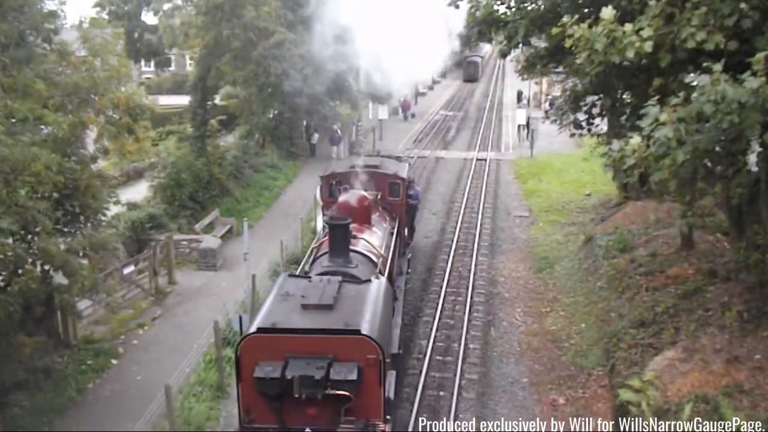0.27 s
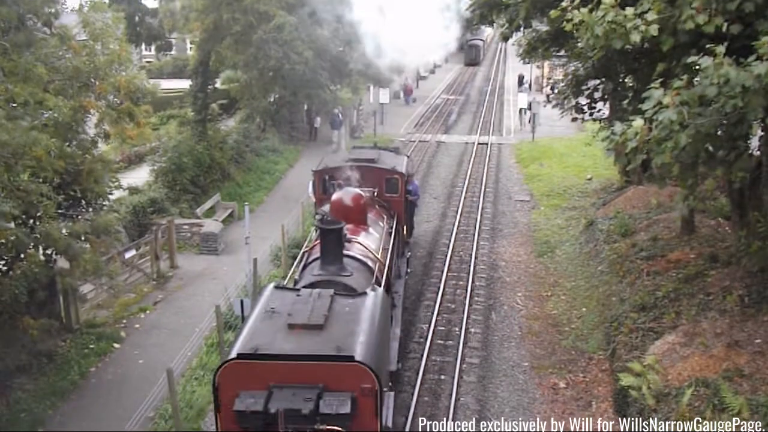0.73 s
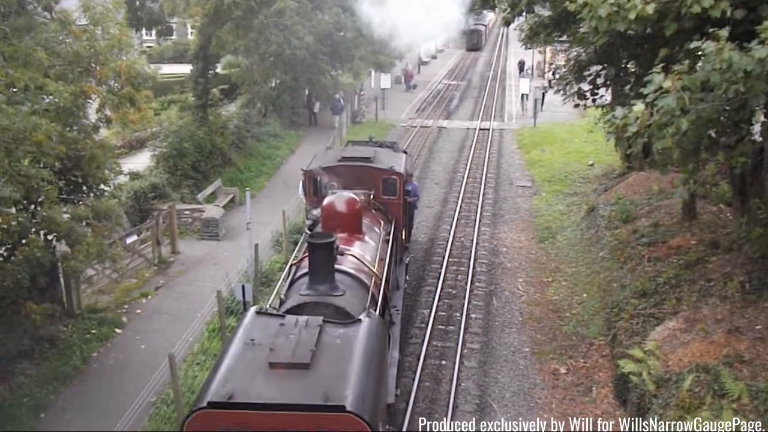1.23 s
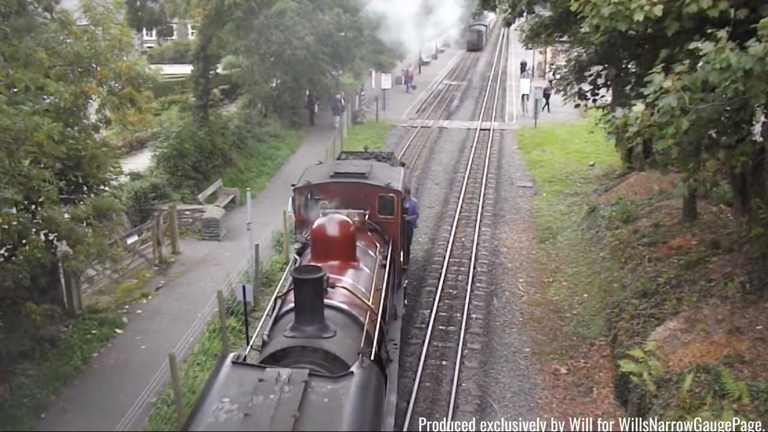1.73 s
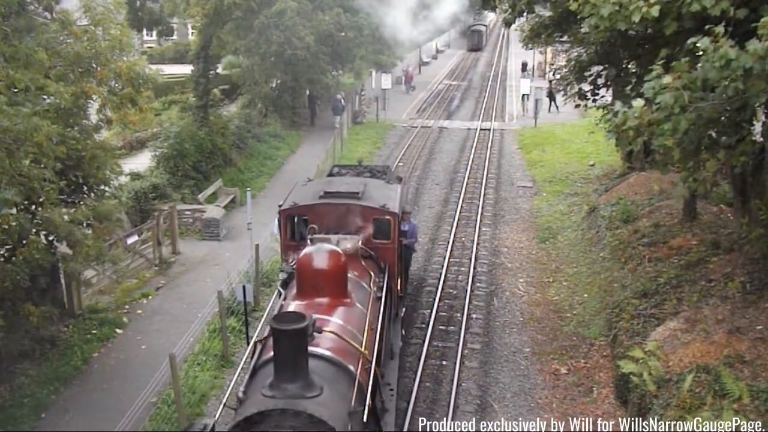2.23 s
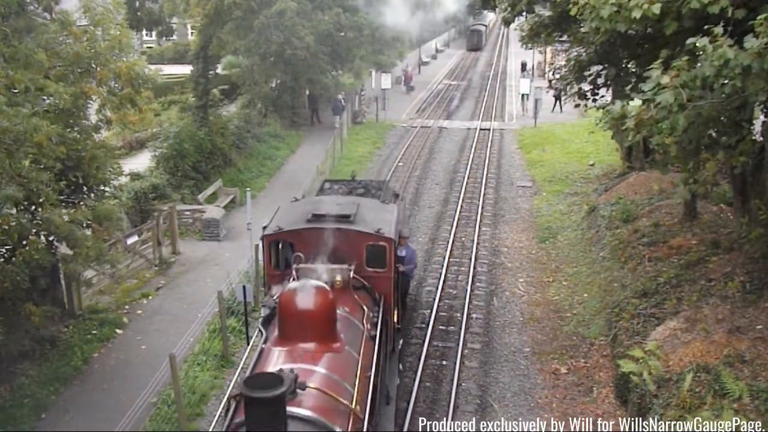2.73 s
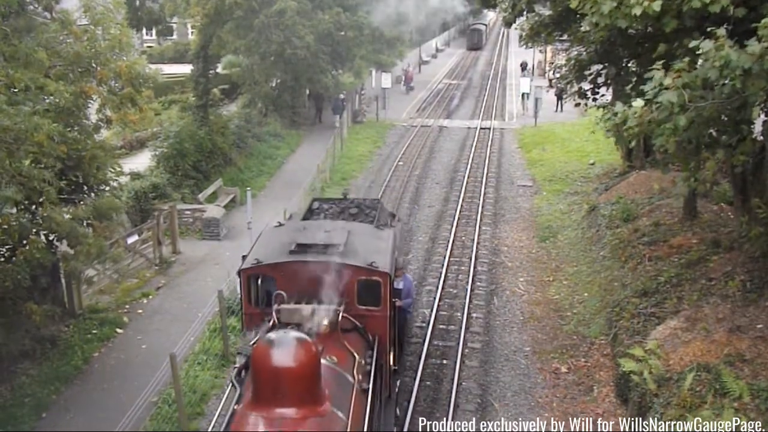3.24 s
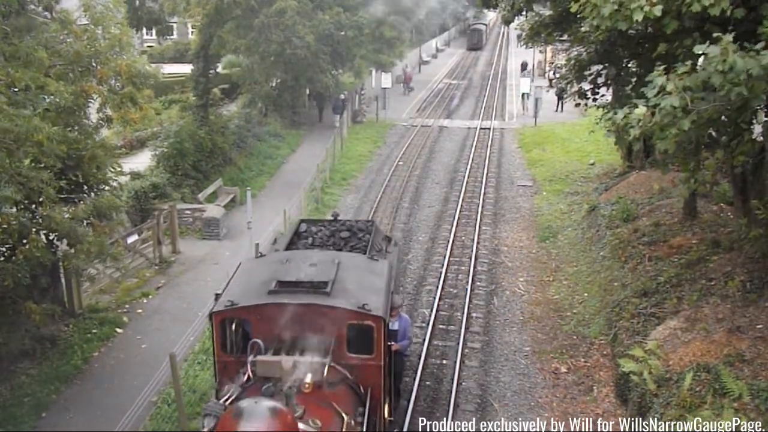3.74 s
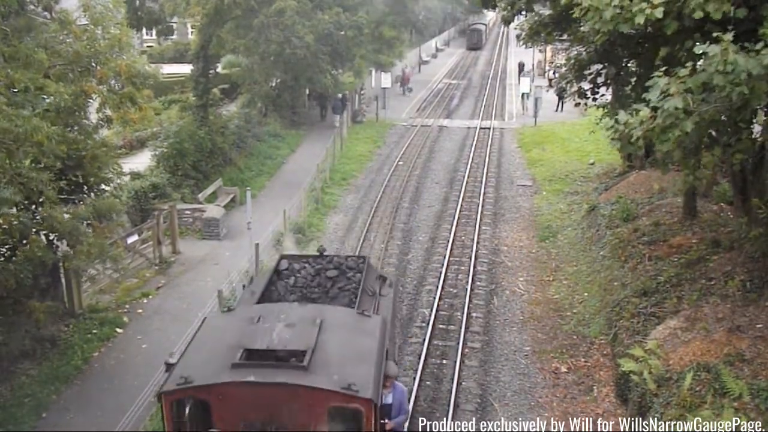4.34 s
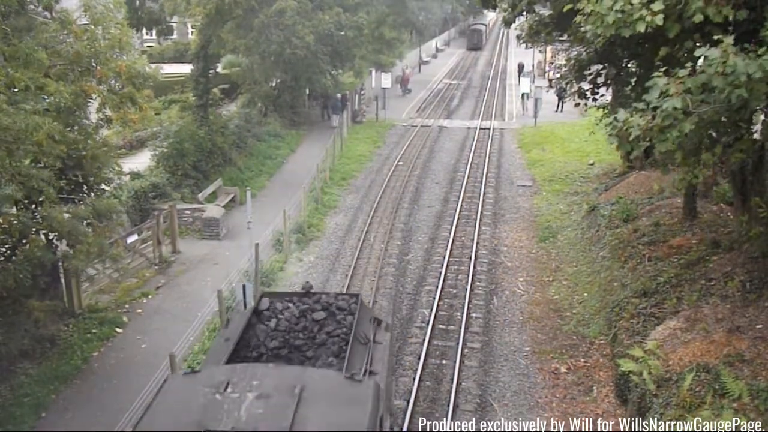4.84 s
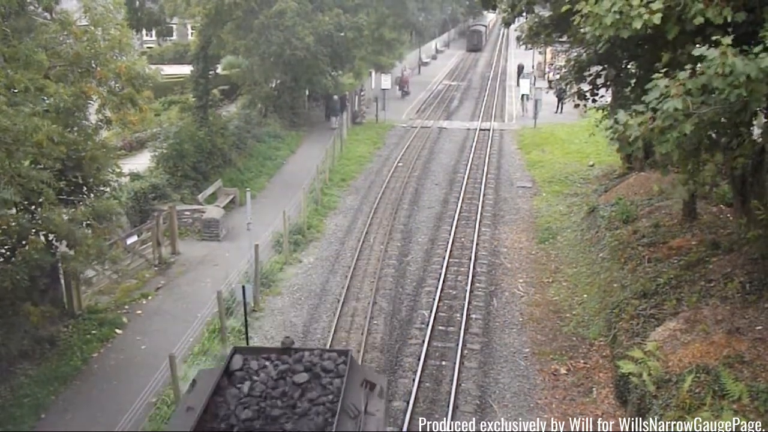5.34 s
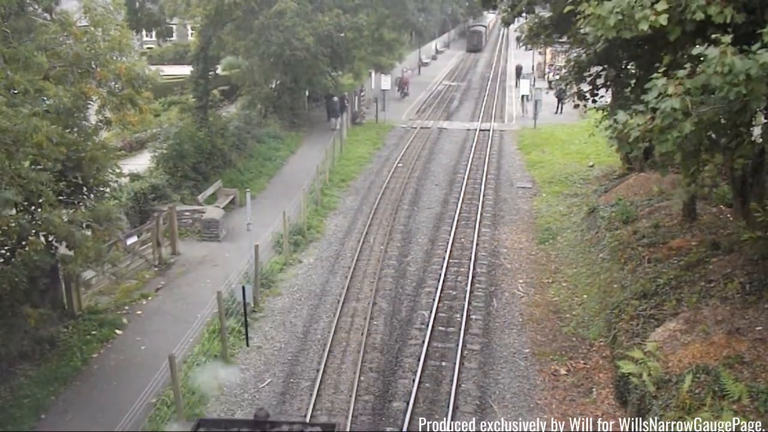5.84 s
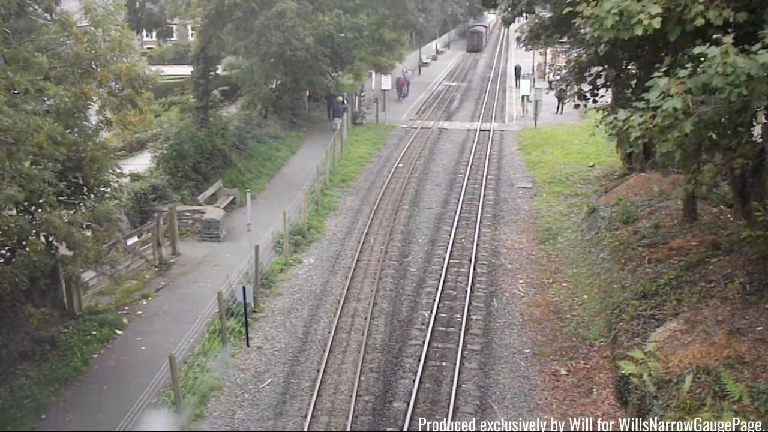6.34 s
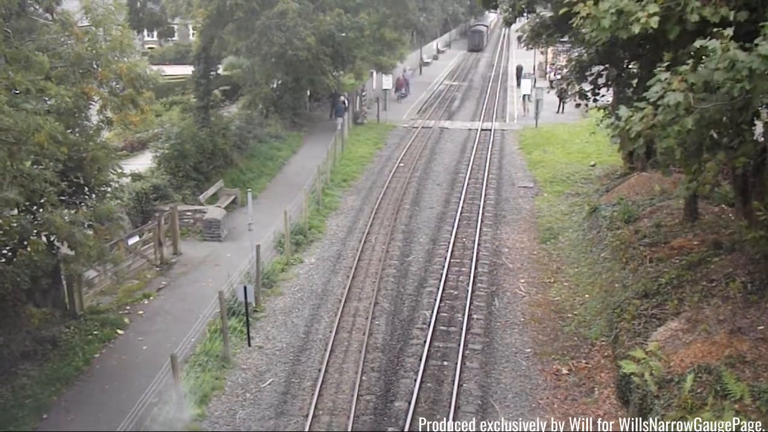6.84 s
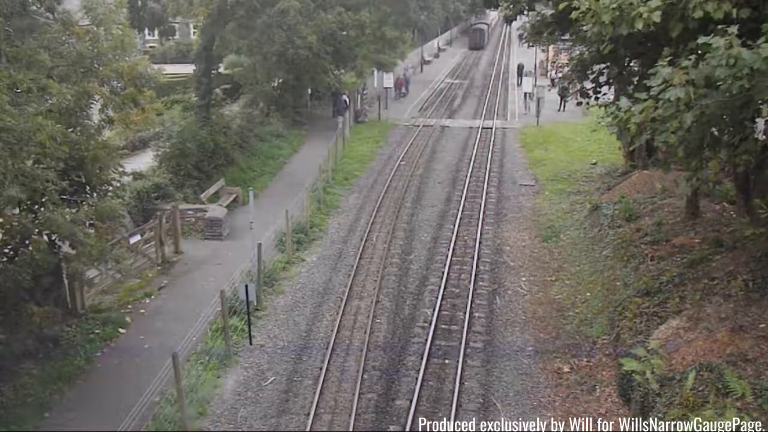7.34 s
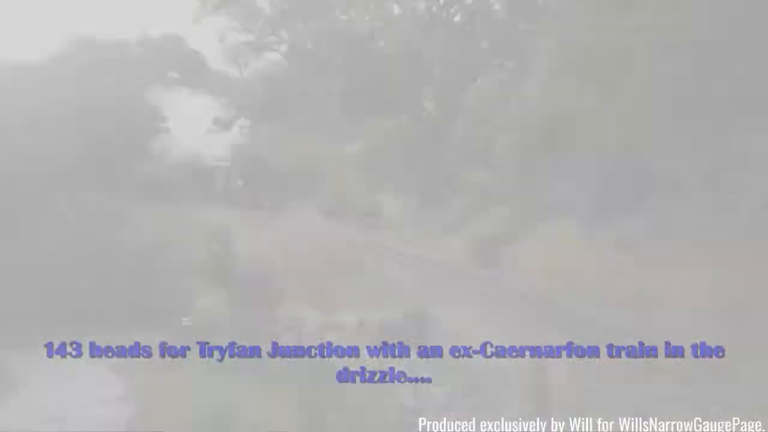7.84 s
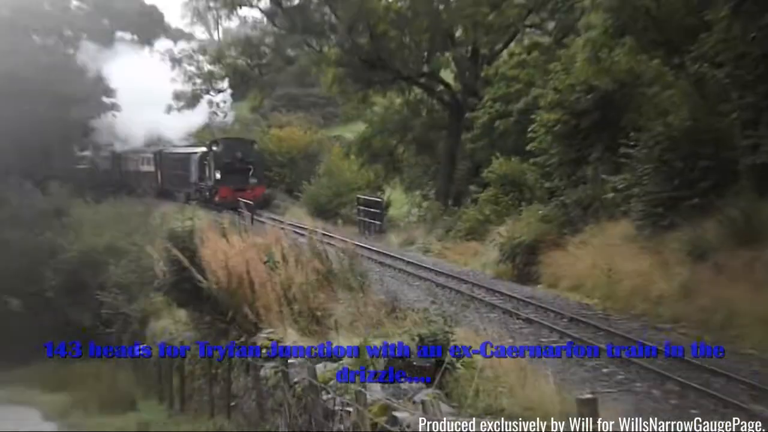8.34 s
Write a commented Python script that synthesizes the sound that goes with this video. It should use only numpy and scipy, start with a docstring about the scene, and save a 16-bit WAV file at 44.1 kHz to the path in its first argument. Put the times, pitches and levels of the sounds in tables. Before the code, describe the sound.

A small steam locomotive rolls close beneath, its safety valve hissing with a fluttering, ringing roar, then a smoother hiss fades into faint drizzle.

```python
"""A safety valve sputters and rings on a passing narrow-gauge steam locomotive until the cab hides it.
Its steam is noise through throat and casing resonances under a fluttering jet. A smoother leak, band-shaped
noise, swells and fades behind it, over rumbling wheels, narrow hums, and knocks and squeaks of the running gear.
The engine fades into a quiet lineside: a faint wash of drizzle, a small motor's whir, and a few near drops
that tick as short rings and splashes."""
import sys
import numpy as np
from scipy import signal
from scipy.fft import rfft, irfft, next_fast_len
from scipy.io import wavfile
from scipy.ndimage import uniform_filter1d, map_coordinates

SR = 44100
rng = np.random.default_rng(int(sys.argv[2]) if len(sys.argv) > 2 else 0)


def store_pcm(level_fs):
    """Save levels as 16-bit WAV."""
    pcm = np.round(np.clip(level_fs, -1, 1) * 32767).astype(np.int16)
    wavfile.write(sys.argv[1], SR, np.atleast_2d(pcm).T)


N = 378378

# Resonances of the valve's throat, of a shoulder that radiates upward, and of the casing:
# (centre [Hz], half-width [Hz], relative level [dB])
THROAT_MODES = [(3850, 230, -9), (4095, 130, -2), (4310, 93, -7.5)]
SHOULDER_MODES = [(3470, 140, -4.5), (3800, 280, -3.5), (4260, 170, -2)]
CASING_MODES = [(829, 18, -3.5), (968, 15, -4), (1168, 30, -5.5), (1360, 26, -5), (1480, 11, -1.5),
                (1706, 110, -6), (1802, 28, 2), (1943, 126, 0)]
# Spectra of the broad blow, the jet and the wet spray: (frequency [Hz], relative density [dB per Hz])
BLOW_SPECTRUM = [(300, -28), (900, -13.5), (1130, -6.5), (1600, -7), (2200, -1), (2500, -2.5), (2850, -0.5),
                 (3200, -1.5), (4600, -0.5), (5200, -3.5), (6000, -7.5), (8000, -9)]
JET_SPECTRUM = [(4700, -33), (5600, -4.5), (6200, 0), (6650, 3), (7000, 2), (7400, 4.5), (8000, 2.5),
                (8550, 4.5), (9300, -0.5), (10500, -12), (13000, -40)]
SPRAY_SPECTRUM = [(7500, -32), (9300, -4), (10200, -3), (11100, -1), (11700, -2.5), (12400, -1),
                  (13300, -8.5), (14200, -6), (15600, -10)]


def safety_valve(flutter_db=1.33, throat_db=-2, shoulder_db=-2.5, casing_db=-1, blow_db=0.5,
                 jet_db=2.0, spray_db=3.0, jet_share=0.42):
    """Wet steam lifts the valve unevenly: every spurt rings throat and casing and feeds the jet above them."""
    throat_level, casing_level, jet_level, spray_level = valve_levels()
    near = ramp(0.75, 3.0)  # from afar, scattered sound smooths the sputter
    flutter = wobble(70) + .5 * wobble(38) + .5 * wobble(170)
    lift = flutter_db * (0.42 + 0.38 * near) * flutter

    throat = amp(throat_db) * ringing(THROAT_MODES)
    shoulder = amp(shoulder_db) * near * ringing(SHOULDER_MODES)
    bright = (throat + shoulder) * amp(throat_level + lift + 0.75 * wobble(110))
    bright *= 1 - 0.51 * ramp(4.3, 4.4)  # the bright ring drops first

    casing_gain = amp(casing_level + casing_db + 0.38 * lift + .5 * wobble(60))
    hollow = casing_gain * ringing(CASING_MODES)
    blow = amp(throat_level + blow_db + 0.76 * lift) * rush(BLOW_SPECTRUM)

    jet = amp(jet_level + jet_db + 1.04 * wobble(80)) * rush(JET_SPECTRUM)
    spray = amp(spray_level + spray_db + 0.59 * wobble(80)) * rush(SPRAY_SPECTRUM)
    hiss = amp(jet_share * lift) * (jet + spray)

    in_view = 1 - ramp(4.48, 4.58)  # the cab roof comes between valve and listener
    return in_view * swept(bright + hollow + blow + hiss)


# Rows for throat, casing, jet and spray, each strongest at its own time, levels before trims:
# (level [dB], time facing the listener [s], time to half power [s], loss behind the cab [dB])
VALVE_BEAMS = [(-21.5, 2.57, 1.49, 4.5), (-27.5, 2.03, 1.74, 1.5), (-21.5, 3.26, 1.9, 4.5),
               (-22, 2.54, 1.42, 0.5)]
# The valve spits extra water: (peak time [s], half length to 1/e [s], full gain, as in the spray [dB])
WATER_SPITS = [(0.15, 0.22, 3.5), (0.975, 0.23, 3.5)]
# The valve lifts further or sags: (middle [s], half length to 1/e [s], full change, as in the throat [dB])
LIFT_SURGES = [(0.218, 0.06, 1.4), (1.58, 0.15, 1.1), (1.886, 0.023, -2.5), (2.873, 0.054, -3),
               (3.662, 0.12, 1.2), (4.077, 0.025, 2.5), (4.29, 0.054, 1.5), (4.355, 0.018, -2.5)]
# The cab screens the valve: (start of screening [s], fully screened [s])
CAB_SCREEN = (4.02, 4.49)
CAB_S, CAB_HALF_S = 4.1, 0.56  # the cab goes under: middle and half length to 1/e [s]


def valve_levels(spit_in_jet=0.67, surge_in_hiss=0.52, off_cab_db=4.0):
    """Each part swells in dB as it nears; the cab throws back the casing's ring and screens every part."""
    t = np.arange(N) / SR
    screened = ramp(*CAB_SCREEN)
    throat, casing, jet, spray = [db + passing(facing_s, reach_s) - lost_db * screened
                                  for db, facing_s, reach_s, lost_db in VALVE_BEAMS]
    spit = sum(db * bump(t, s, half) for s, half, db in WATER_SPITS)
    surge = sum(db * bump(t, s, half) for s, half, db in LIFT_SURGES)
    casing = casing + off_cab_db * bump(t, CAB_S, CAB_HALF_S)
    hiss_surge = surge_in_hiss * surge
    return throat + surge, casing + surge, jet + spit_in_jet * spit + hiss_surge, spray + spit + hiss_surge


# Hollows glide through the steam as the angle to the boiler changes: (deepest time [s],
# half length to 1/e [s], centre at that time [Hz], rise [Hz per s], half-width to 1/e [Hz], depth [dB])
STEAM_HOLLOWS = [(0.706, 1.4, 7580, 200, 745, 4), (2.15, 0.66, 9450, 1700, 750, 6.5),
                 (2.795, 1.16, 5270, 260, 370, 7.5), (7.85, 0.55, 4000, 100, 650, 4)]


def swept(x, uneven_db=1):
    """Moving hollows in the spectrum of x, and a slight random unevenness over time and frequency."""
    hz, t, bins = signal.stft(x, SR, nperseg=512)
    unevenness = uniform_filter1d(rng.standard_normal(bins.shape[1:]), size=3, axis=0)
    unevenness = uniform_filter1d(unevenness, size=4, axis=1)
    db = uneven_db * unit(unevenness)
    for s, half, centre, rise, width, depth in STEAM_HOLLOWS:
        gliding_band = bump(hz[:, None], centre + rise * (t - s), width)
        db = db - depth * bump(t, s, half) * gliding_band
    return signal.istft(bins * amp(db), SR, nperseg=512)[1][:, :N]


# Spectra of the leak's hiss and its lower rush: (frequency [Hz], relative density [dB per Hz])
LEAK_HISS_SPECTRUM = [(2000, -21.5), (3400, -9), (4200, -5), (5200, -10), (6600, -6), (7000, -6),
                      (7500, -4.5), (9000, -5), (10800, -6.5), (12300, -5.5), (13800, -7.5), (15200, -14),
                      (15800, -43)]
LEAK_RUSH_SPECTRUM = [(600, -35.5), (1300, -13), (1600, -7), (1770, -0.5), (1970, -1), (2300, -6.5),
                      (2950, -6.5), (3600, -11.5), (5000, -8), (8000, -38)]
# The leak swells as the wheels turn: (middle [s], length [s], full gain, as in the hiss [dB])
WHEEL_SWELLS = [(5.19, 0.39, 2.5), (6.054, 0.33, 3.5), (6.885, 0.31, 4), (7.3, 0.16, 1.5),
                (7.68, 0.25, 2.4)]
SWELL_EDGE_S = 0.15  # rise and fall of a swell
# Fades of the hiss, and of the leak's rush and the rolling: (start [s], silent [s])
HISS_FADE = (7.53, 8.29)
BODY_FADE = (7.07, 8.4)


def steam_leak(hiss_db=-21.7, scattered_db=-34.5, rush_db=-32, swell_in_rush=0.27,
               rush_sag_db_per_s=3.0, waver_db=0.15):
    """A smooth leak takes over from the valve, swells with the wheels and recedes into scatter from trees."""
    t = np.arange(N) / SR
    swell = sum(db * np.clip(.5 + (length / 2 - np.abs(t - s)) / SWELL_EDGE_S, 0, 1)
                for s, length, db in WHEEL_SWELLS)
    direct = amp(hiss_db + passing(closest_s=4.19, reach_s=0.8))
    hiss_gain = np.hypot(direct, amp(scattered_db)) * amp(swell) * (1 - ramp(*HISS_FADE))
    sag_db = rush_sag_db_per_s * (t - CAB_SCREEN[1])
    rush_gain = amp(rush_db - sag_db + swell_in_rush * swell) * (1 - ramp(*BODY_FADE))
    leak = hiss_gain * rush(LEAK_HISS_SPECTRUM) + rush_gain * rush(LEAK_RUSH_SPECTRUM)
    return ramp(4.1, 4.57) * amp(waver_db * wobble(25)) * swept(leak, uneven_db=0.85)


# Spectra of wheel rumble and hollow engine roar: (frequency [Hz], relative density [dB per Hz])
RUMBLE_SPECTRUM = [(20, -33), (35, -27), (52, -9), (95, -12), (140, -7.5), (185, -2.5), (250, -4), (340, 2),
                   (430, 0), (520, 6), (650, -0.5), (900, -18), (2000, -42)]
ROAR_SPECTRUM = [(350, -13), (550, -9.5), (720, -2.5), (840, 0.5), (985, 1), (1130, -3.5), (1300, -6.5),
                 (1700, -6), (3000, -54)]


def rolling(rumble_db=-39, roar_db=-36.5, cab_db=-30, lumpy_db=1.85):
    """Wheels rumble unevenly as they pass; the engine's hollow roar peaks as the cab goes under."""
    rumble = rumble_db + passing(closest_s=3.96, reach_s=2.22)
    engine_gain = amp(roar_db + passing(closest_s=3.35, reach_s=2.25))
    cab_gain = amp(cab_db) * bump(np.arange(N) / SR, CAB_S, CAB_HALF_S)
    wheels = amp(rumble + lumpy_db * wobble(30)) * rush(RUMBLE_SPECTRUM)
    body = np.hypot(engine_gain, cab_gain) * amp(1.5 * wobble(22)) * rush(ROAR_SPECTRUM)
    return (1 - ramp(*BODY_FADE)) * (wheels + body)


# Hums that swell and die in wheels and bodywork:
# (peak time [s], half length to 1/e [s], pitch [Hz], half-width [Hz], peak level [dB])
ROLLING_HUMS = [(0.751, 0.26, 772, 12, -42.5), (1.372, 0.093, 843, 20, -38), (1.45, 0.39, 193.8, 38, -48),
                (2.25, 0.25, 405, 110, -45), (4.147, 0.3, 470, 89, -39), (5.036, 0.11, 257, 73, -42)]


def hums():
    """The rolling stirs one narrow resonance after another."""
    t = np.arange(N) / SR
    return sum(amp(db) * bump(t, s, half) * ringing([(hz, width, 0)])
               for s, half, hz, width, db in ROLLING_HUMS)


# Knocks of the running gear: (time [s], level before the attack and decay [dB], pitch [Hz])
GEAR_KNOCKS = [(1.665, -34, 280), (1.943, -31, 460), (3.45, -34, 250), (5.04, -31.5, 280),
               (5.636, -24.5, 400), (5.647, -22.5, 357), (5.677, -26, 660), (5.98, -30, 420),
               (6.445, -30, 596), (6.56, -34, 480), (7.15, -34, 400), (7.46, -35, 380), (7.92, -42, 600)]


def knocks(attack_s=0.00084, t60_s=0.14, damping=1.0, order=5):
    """Slack in the running gear closes with dull blows, each into a broad, heavily damped resonance."""
    age = np.arange(SR // 2) / SR
    hz = np.fft.rfftfreq(len(age), 1 / SR) + 1
    blows = np.zeros(N + SR)
    onset = 1 - np.exp(-age / attack_s)
    for s, db, pitch in GEAR_KNOCKS:
        detune = (hz / pitch - pitch / hz) / damping
        band = (1 + detune ** 2 / order) ** (-order / 2)
        thud = unit(irfft(rfft(rng.standard_normal(len(age))) * band, len(age)))
        blows[round(s * SR):][:len(age)] += amp(db - 60 * age / t60_s) * onset * thud
    return blows[:N]


# Squeaks of dry joints: (start [s], length [s], peak level [dB], first pitch [Hz], last pitch [Hz])
JOINT_SQUEAKS = [(1.932, 0.05, -30, 520, 995), (5.635, 0.024, -29, 1130, 780),
                 (5.656, 0.0215, -24.5, 520, 720)]


def squeaks(rough_hz=60):
    """Dry joints in the running gear give short, rough, gliding squeaks."""
    out = np.zeros(N)
    for s, length, db, first_hz, last_hz in JOINT_SQUEAKS:
        progress = ramp(s, s + length)
        pitch = first_hz + (last_hz - first_hz) * progress + rough_hz * wobble(400)
        swell = np.sin(np.pi * progress)
        out += amp(db) * swell * np.sin(2 * np.pi * np.cumsum(pitch) / SR)
    return out


# Near raindrops, levels before the attack and decay:
# (time [s], ring level [dB], ring pitch [Hz], splash level [dB])
NEAR_DROPS = [(8.0995, -34, 600, -25), (8.155, -37, 1250, -34.5), (8.164, -34, 745, -32),
              (8.2425, -30.5, 785, -30), (8.296, -34, 3624, -38), (8.348, -35, 3520, -45),
              (8.571, -34, 3600, -39)]


def raindrops(ring_t60_s=0.023, splash_t60_s=0.022, attack_s=0.001):
    """Each near drop splashes and briefly rings what it lands on."""
    t = np.arange(SR // 10) / SR
    rings, splashes = np.zeros((2, N + SR))
    onset = 1 - np.exp(-t / attack_s)
    for s, ring_db, hz, splash_db in NEAR_DROPS:
        at = slice(round(s * SR), round(s * SR) + len(t))
        rings[at] += amp(ring_db - 60 * t / ring_t60_s) * onset * np.sin(2 * np.pi * hz * t)
        splashes[at] += amp(splash_db - 60 * t / splash_t60_s) * onset
    splash_noise = rush([(200, -8), (700, 0), (1800, -4.0), (3300, 2.5), (6000, -9), (15000, -12)])
    return rings[:N] + splashes[:N] * splash_noise


# Spectrum of fine rain on leaves: (frequency [Hz], relative density [dB per Hz])
DRIZZLE_SPECTRUM = [(24, -46), (40, -18), (108, -10), (221, -8.5), (292, -5), (385, -7), (702, -3),
                    (844, -5), (1020, 0), (1280, -5), (1400, -4), (2500, -13.5), (2870, -4), (5360, -19.5),
                    (10000, -19), (13000, -49), (22000, -120)]


def drizzle(air_db=-49):
    """Fine rain on leaves makes a faint wash."""
    return ramp(7.6, 8.3) * amp(air_db + 0.64 * wobble(30)) * rush(DRIZZLE_SPECTRUM)


# Resonances of the faint whir: (centre [Hz], half-width [Hz], relative level [dB])
WHIR_MODES = [(2980, 200, -3), (9800, 70, -13), (11700, 400, -6), (13200, 220, -1)]


def whir(level_db=-52.5, depth=0.58, turn_hz=95):
    """In the quiet, a small motor buzzes once a turn, a little unsteadily."""
    turn = 2 * np.pi * turn_hz * np.arange(N) / SR + .8 * wobble(24)
    buzz = 1 + depth * np.cos(turn)
    return ramp(7.7, 8.4) * amp(level_db) * buzz * ringing(WHIR_MODES)


def rush(spectrum):
    """Turbulence with a broad spectrum, silent beyond its end points."""
    lowest_hz, highest_hz = spectrum[0][0], spectrum[-1][0]
    return noise(lambda hz: amp(along(spectrum, hz)) * (hz > lowest_hz) * (hz < highest_hz))


def ringing(modes):
    """Turbulence inside steep-sided resonances, each at half amplitude one half-width off centre."""
    def gain(hz):
        power = sum((amp(db) / (1 + ((hz - centre) / width) ** 2)) ** 2 for centre, width, db in modes)
        return np.sqrt(power)
    return noise(gain)


# How alike the two sides are across the spectrum: (frequency [Hz], left-right correlation [0 to 1])
SIDE_LIKENESS = [(2500, 1), (3300, .99), (5000, .85), (8000, .91), (12500, .93), (15000, .82)]


def noise(gain):
    """Stereo noise of rms 1, coloured by gain(Hz); the two sides part a little in the treble."""
    def mid_side_response(hz):
        turn = np.arccos(np.clip(along(SIDE_LIKENESS, hz), -1, 1)) / 2
        return gain(hz) * np.array([np.cos(turn), np.sin(turn)])
    mid, side = filtered(rng.standard_normal((2, N)), mid_side_response)
    return unit(np.array([mid + side, mid - side]))


def off_centre(x, lag_ms):
    """The treble of x reaches the left side just later; the bass is central."""
    def response(hz):
        lag_s = lag_ms / 1000 * np.clip((hz - 2600) / 1400, 0, 1)
        return np.exp(1j * np.pi * hz * lag_s * np.array([[-1], [1]]))  # half the lag on each side
    return filtered(x, response)


def passing(closest_s, reach_s):
    """Level in dB of a source rolling by at steady speed: half power reach_s before and after closest_s."""
    return -10 * np.log10(1 + ((np.arange(N) / SR - closest_s) / reach_s) ** 2)


def bump(t, peak_s, half_s):
    """A smooth rise to 1 and fall."""
    return np.exp(-((t - peak_s) / half_s) ** 2)


def ramp(start, end):
    """Gain that rises from 0 to 1 between two times in seconds."""
    return np.clip((np.arange(N) / SR - start) / (end - start), 0, 1)


def wobble(rate):
    """A smooth random curve, rate knots a second."""
    knots = rng.standard_normal(int(N * rate / SR) + 4)
    return map_coordinates(knots, [np.arange(N) * rate / SR])


def filtered(x, response):
    """x times a response of frequency."""
    size = next_fast_len(N + SR // 2)
    return irfft(rfft(x, size) * response(np.fft.rfftfreq(size, 1 / SR)), size)[..., :N]


def along(points, hz):
    """(Hz, value) points read on a log axis."""
    f, v = np.transpose(points)
    return np.interp(np.log(hz + 1), np.log(f + 1), v)


def amp(db):
    """Decibels to gain."""
    return 10 ** (np.asarray(db) / 20)


def unit(x):
    """x at rms 1."""
    return x / np.sqrt(np.mean(x ** 2) + 1e-20)


def scene():
    """The steam blows a shade right of centre, over the wheels; then the drizzle takes over."""
    steam = off_centre(safety_valve() + steam_leak(), lag_ms=0.021)
    engine = steam + rolling() + hums() + knocks() + squeaks()
    return engine + raindrops() + drizzle() + whir()


def record(dry):
    """A narrow dip thins the treble, and nothing passes above the band limit."""
    dip_hz, dip_half_width_hz, depth, top_hz = 7000, 45, .75, 15750

    def response(hz):
        dip = depth / (1 + ((hz - dip_hz) / dip_half_width_hz) ** 2)
        return (1 - dip) * (hz < top_hz)
    return filtered(dry, response)


dry = scene()
out = record(dry)
store_pcm(out)
```